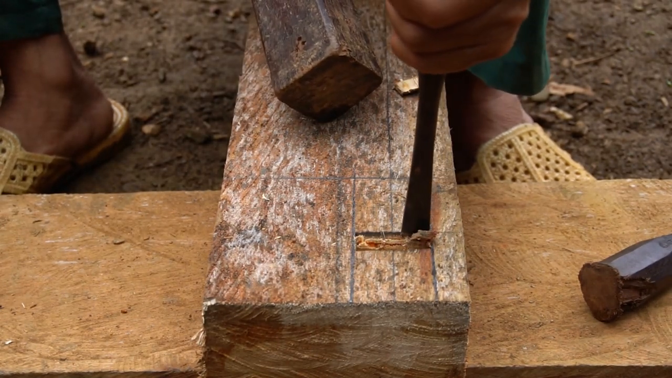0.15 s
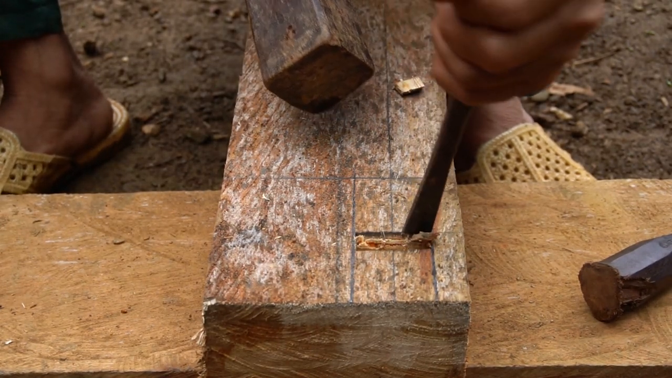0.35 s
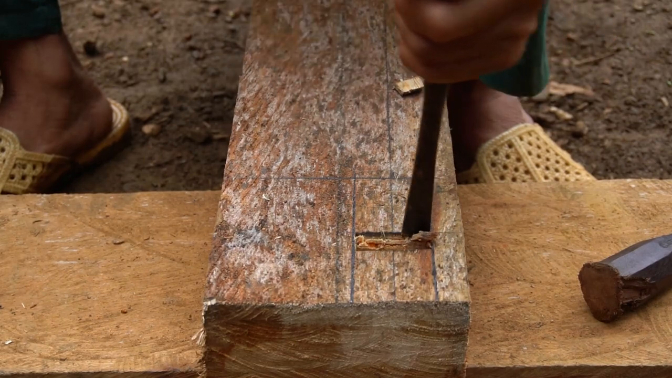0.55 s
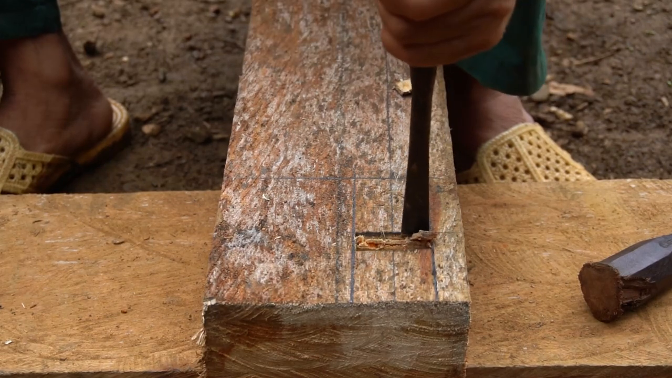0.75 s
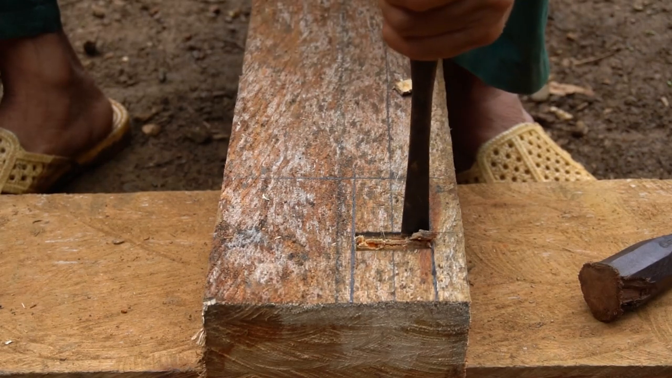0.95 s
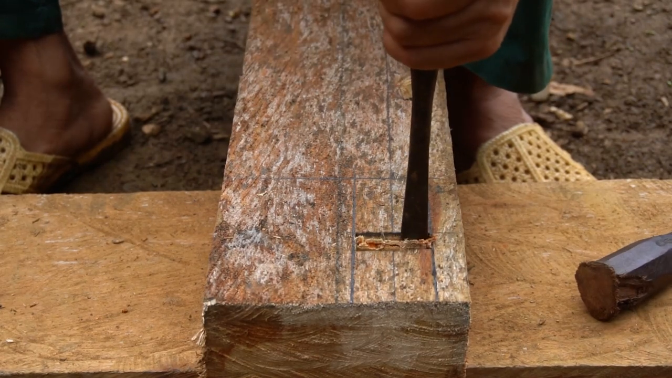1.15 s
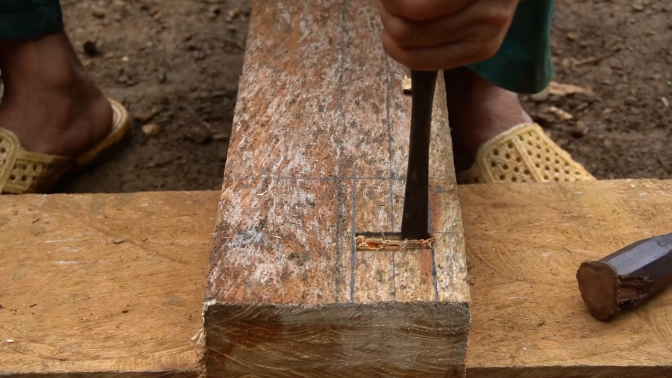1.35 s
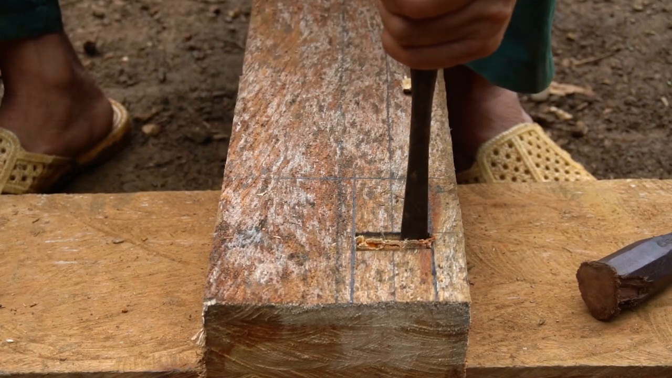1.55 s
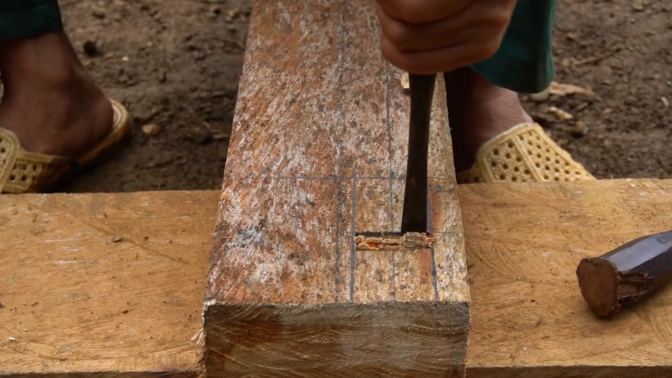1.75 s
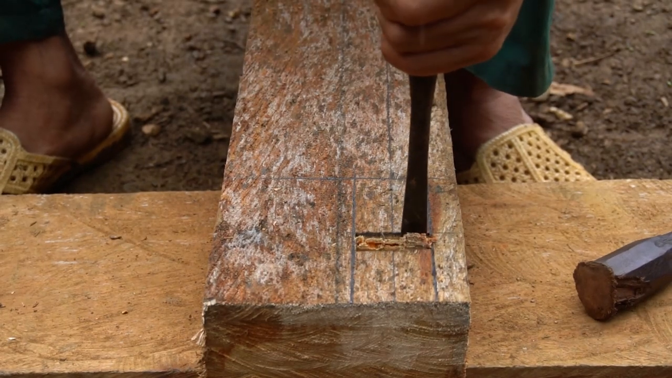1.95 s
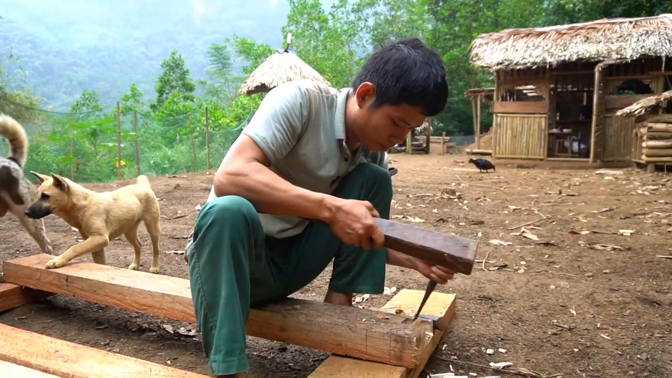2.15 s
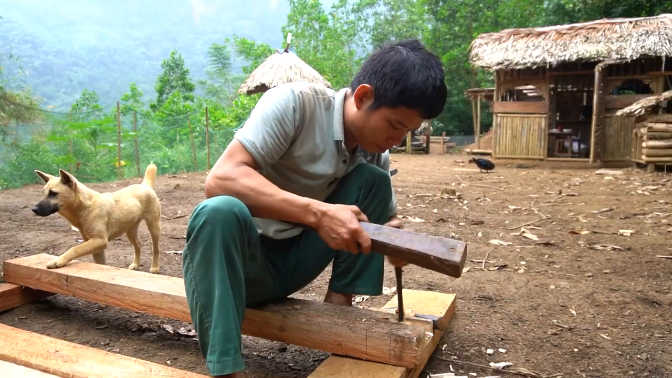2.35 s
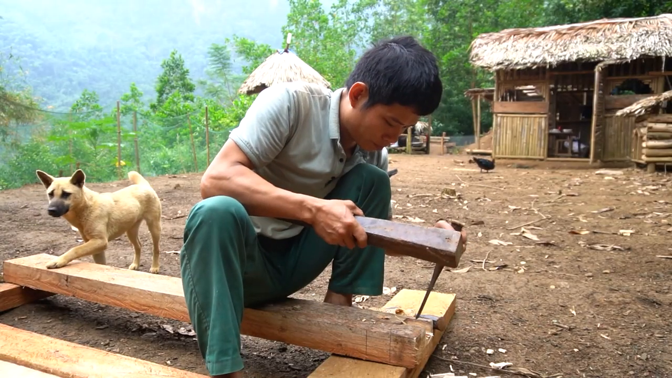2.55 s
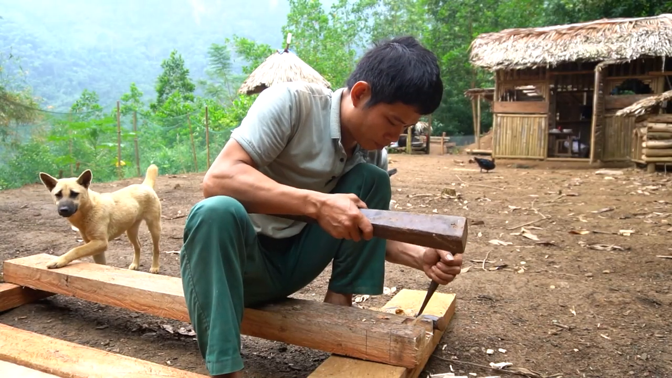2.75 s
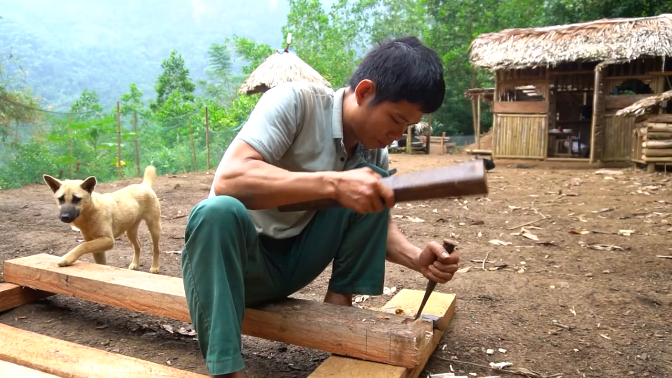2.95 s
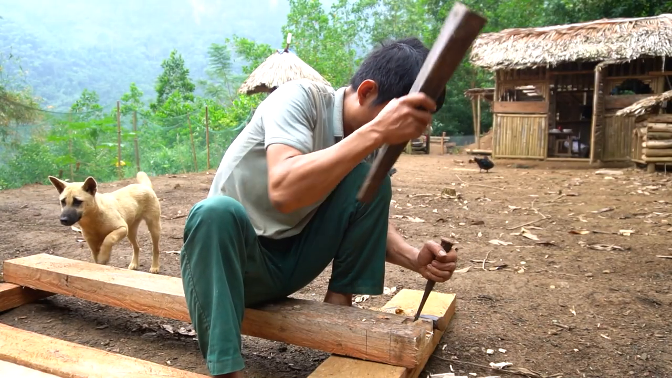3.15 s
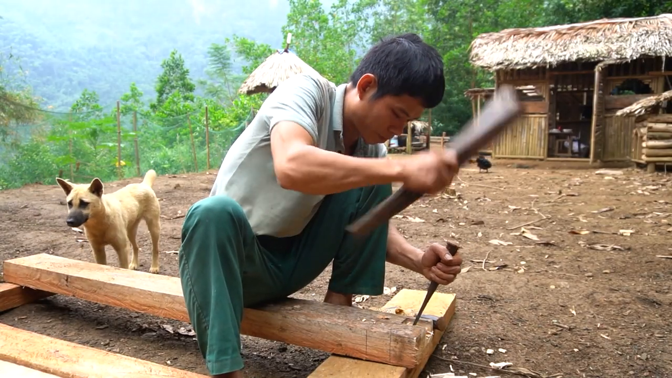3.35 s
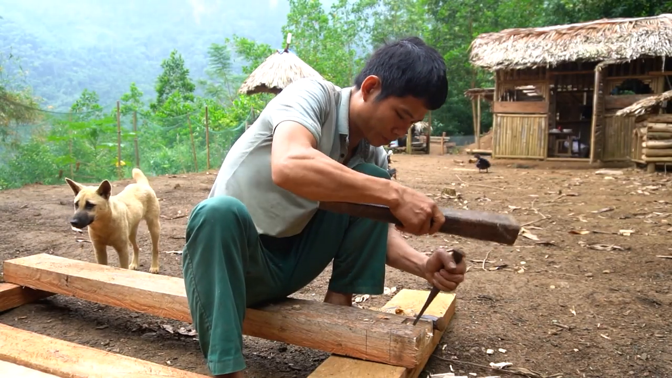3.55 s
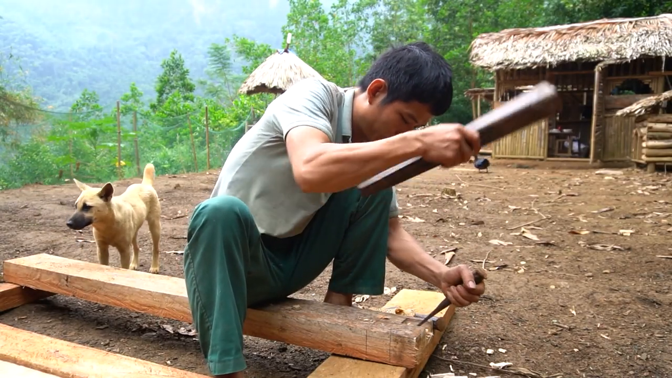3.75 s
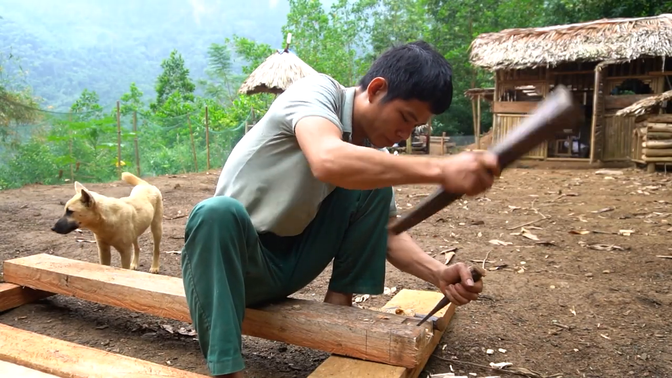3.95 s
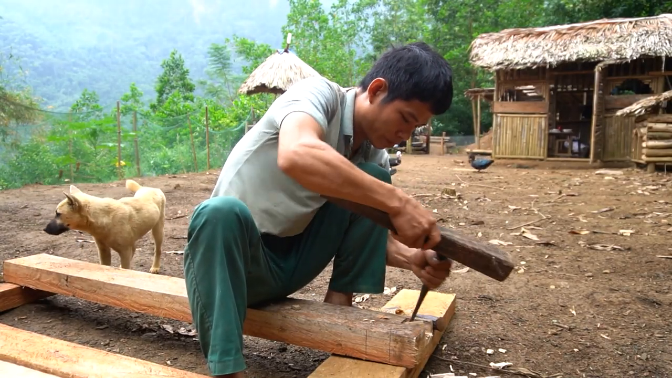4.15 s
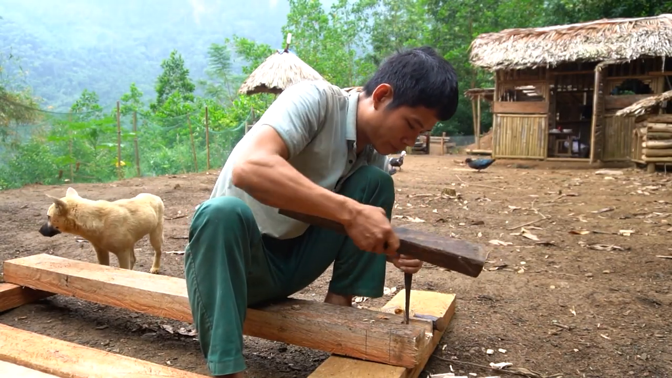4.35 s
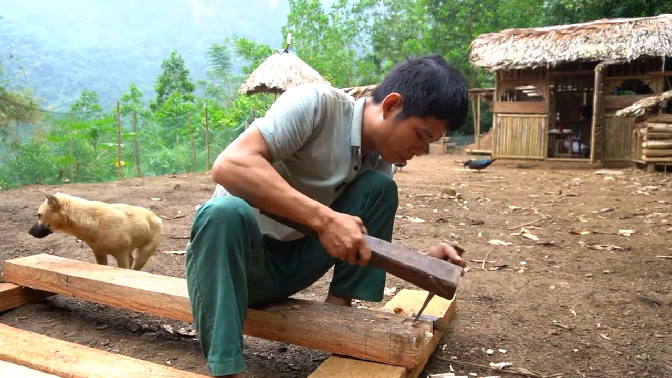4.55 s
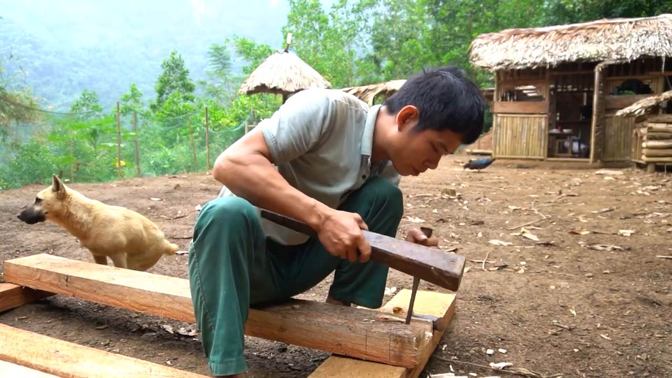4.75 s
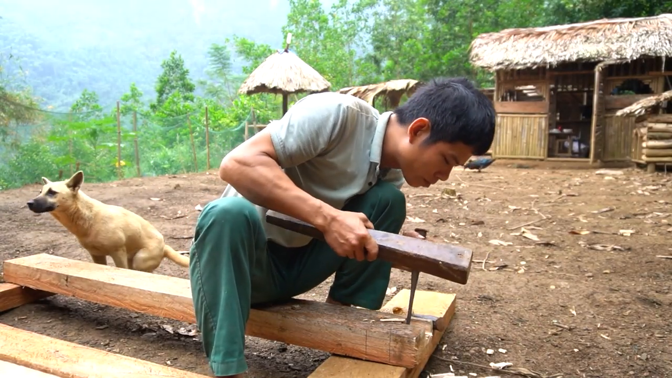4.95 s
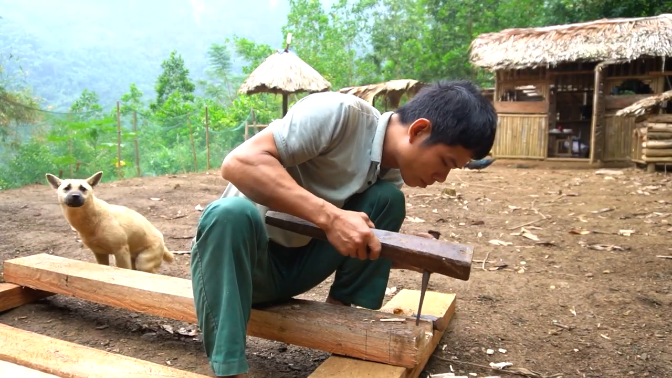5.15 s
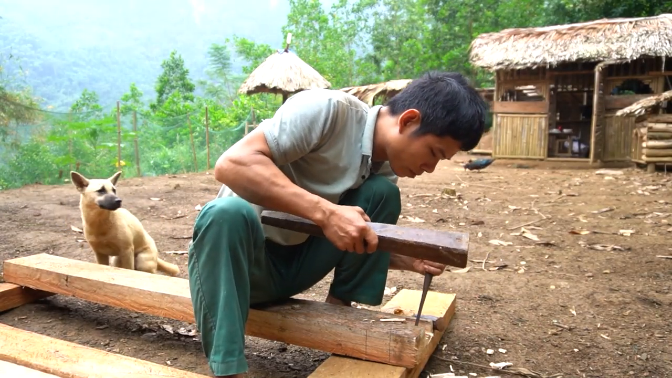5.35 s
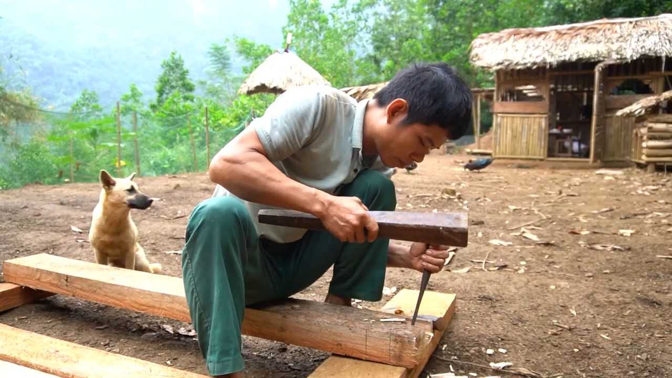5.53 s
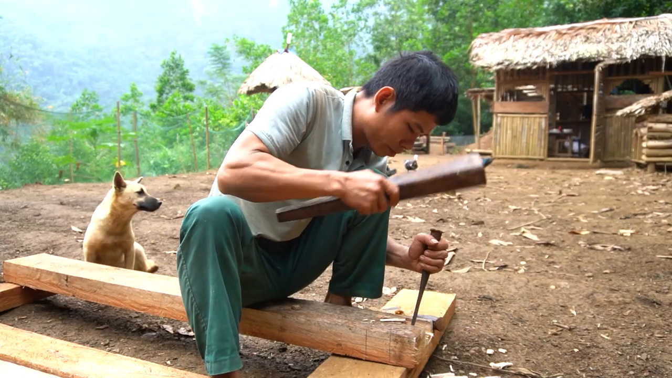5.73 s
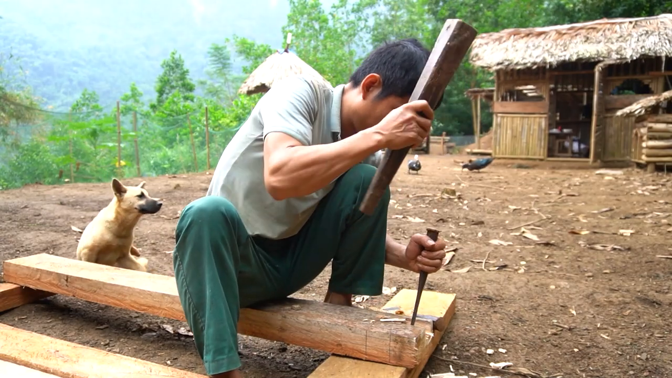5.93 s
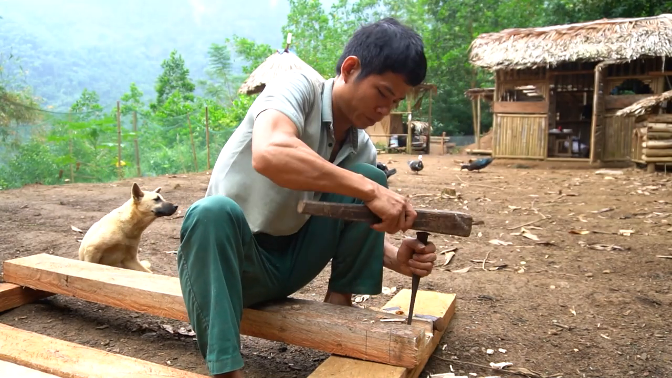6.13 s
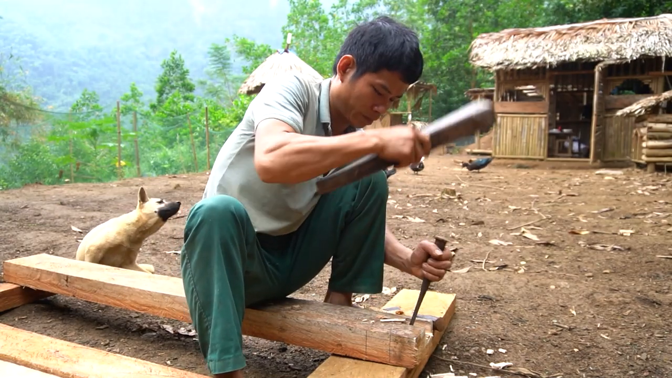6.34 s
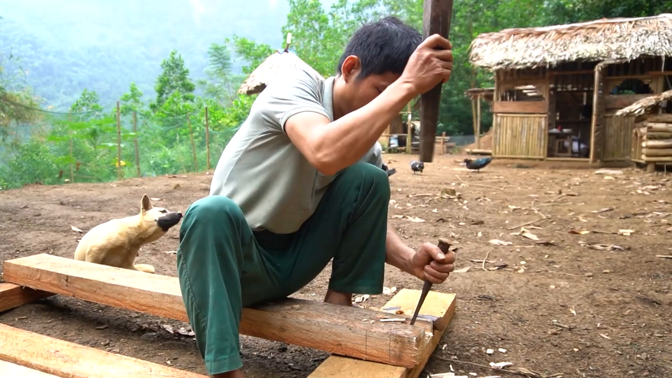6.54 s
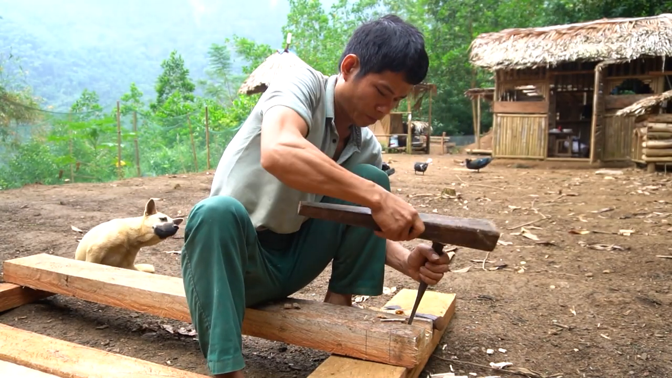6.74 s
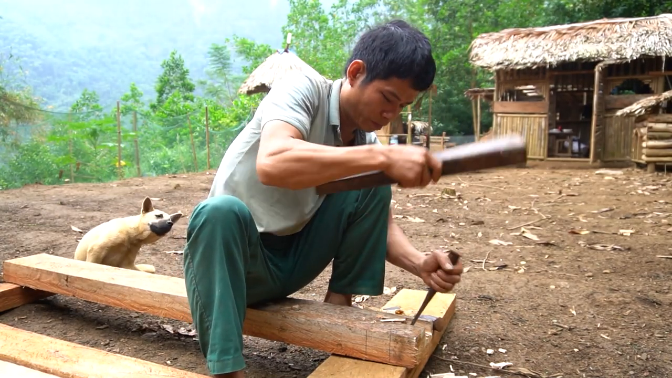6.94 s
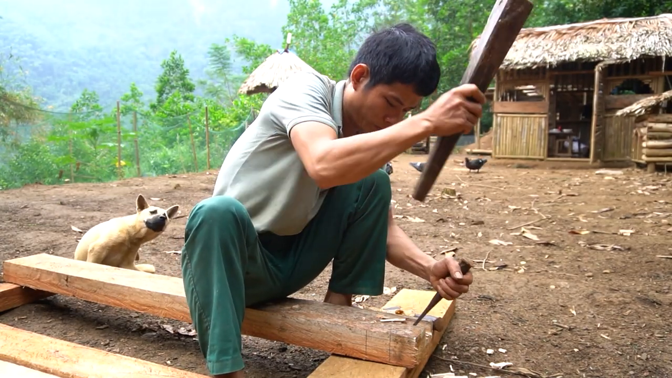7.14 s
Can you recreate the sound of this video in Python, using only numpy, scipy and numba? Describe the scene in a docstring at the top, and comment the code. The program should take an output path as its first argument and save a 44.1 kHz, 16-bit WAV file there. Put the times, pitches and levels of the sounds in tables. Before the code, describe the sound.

Three pairs of sharp mallet blows on a chisel in a wooden beam, with light taps between and distant cicadas.

```python
"""A farm yard, where a wooden mallet drives a chisel into a timber beam close to the microphone.
Each impact tears fibres, excites the damped modes of mallet and beam, and scatters back from huts
and trees; a limiter holds it down. Distant cicadas hiss, leaves rustle and wind stirs the bass.
A faint pair of tones opens the scene, small taps fall between the blows and a fowl calls once."""
import sys
import numpy as np
from scipy import signal
from scipy.fft import rfft, irfft, next_fast_len
from scipy.io import wavfile
from scipy.ndimage import uniform_filter1d
from numba import njit

SR = 44100
rng = np.random.default_rng(int(sys.argv[2]) if len(sys.argv) > 2 else 0)


def store_wav(level_fs):
    """Save 16-bit WAV to argv[1]."""
    pcm = np.round(np.clip(np.atleast_2d(level_fs), -1, 1) * 32767)
    wavfile.write(sys.argv[1], SR, pcm.T.astype(np.int16))


N = 321489

# Level of the cicada hiss as heard, dipping after blows as the recorder turns its gain down:
# (time [s], level [dB])
HEARD_HISS_LEVELS = [(0.0, -43.5), (1.05, -42.5), (1.25, -47), (1.75, -44), (1.95, -47.5), (3.4, -44.5),
                     (3.7, -47.5), (5.1, -45), (6.1, -46), (7.29, -48.5)]
# Noise spectra, each (frequency [Hz], relative spectral level [dB])
CICADA_SPECTRUM = [(2940, -27), (5000, -12), (5230, -12), (5610, 3.5), (5960, 9), (6240, 6), (6520, 2.5),
                   (6900, -61), (7030, -67), (7200, -77), (9360, -45), (15800, -120)]
RUSTLE_SPECTRUM = [(100, 1), (200, 1.5), (400, 2), (650, 3.5), (1000, -5.5), (1700, -3), (3000, -7),
                   (5000, -14), (8000, -19.5), (12000, -24), (16000, -27.5)]
CRACK_SPECTRUM = [(1500, -88), (2500, 6.5), (3500, -3.5), (4800, -12), (6000, -10), (9000, -16.5),
                  (13000, -30), (17000, -16)]
SPLINTER_SPECTRUM = [(800, -5), (1500, 3), (3500, 6), (5000, -1.5), (8000, -9), (12000, -13.5),
                     (17000, -23)]
WIND_SPECTRUM = [(15, -4), (30, 11), (60, 13), (110, 4.5), (150, 1.5), (300, -80)]
GRIT_SPECTRUM = [(1500, -7), (3500, -2.5), (9000, -8.5), (16000, -9)]
# Swells of wind: (peak time [s], level [dB], half-width [s])
WIND_GUSTS = [(2.68, -61, 0.1), (3.86, -52.5, 0.15), (4.754, -59, 0.035), (5.218, -56, 0.17),
              (5.797, -62, 0.082), (7.1, -44, 0.14)]
# A tool sliding on wood: (time [s], duration [s], level [dB])
TOOL_SCRAPES = [(0.209, 0.15, -55.5), (0.7, 0.073, -60), (2.326, 0.09, -52.5), (4.71, 0.048, -55)]
# Ticks of grit and leaves: (time [s], level [dB], left minus right [dB])
GRIT_TICKS = [(0.282, -38, 0.5), (0.383, -43, -7), (0.61, -38, -11), (0.7064, -34, -6), (0.752, -36.5, -4),
              (0.782, -37, -9), (4.279, -35, -1.0), (5.226, -39, -2)]
# Wind striking the microphone: (time [s], peak level [dB], frequency [Hz], time scale [s])
WIND_PUFFS = [(0.217, -42, 65.4, 0.043), (3.076, -40, 113, 0.015), (4.999, -43, 158, 0.015),
              (5.45, -42, 156, 0.019), (6.985, -27.5, 98, 0.026), (7.062, -36, 83, 0.028)]
# Chips, tool and hand on wood: (time [s], knock peak [dB], frequency [Hz], left minus right [dB],
# burst length [s], 60 dB decay [cycles], relative tick level [dB])
WOOD_TAPS = [(0.661, -40, 1830, -14, 0.033, 43, -27), (2.177, -34, 1032, -3, 0.0098, 18, 0.5),
             (2.337, -44, 1910, -8, 0.017, 5.6, -11), (2.389, -43.5, 4230, -6, 0.012, 14, -1.5),
             (2.799, -33.5, 3600, -6, 0.0069, 6.3, -5), (2.878, -33, 2800, -5, 0.067, 4.9, -19),
             (2.906, -29, 1130, -5, 0.077, 7.4, -45), (2.922, -42, 620, 0, 0.021, 19, -34),
             (2.942, -36.5, 1111, 4, 0.16, 2.3, -42), (3.241, -40, 702, -1, 0.022, 2.8, -38),
             (3.764, -34.5, 393, 2.5, 0.074, 7.2, -34), (4.685, -38, 353, 0, 0.054, 2.7, -33),
             (4.769, -42, 234, 1, 0.047, 4.4, -11), (4.989, -42.5, 590, 3, 0.023, 5, -17),
             (5.088, -40, 526, 3, 0.019, 22, -23), (5.154, -38.5, 2300, -2, 0.052, 66, -32),
             (5.18, -40, 410, 1, 0.02, 25, -21), (5.377, -37, 225, -2, 0.037, 3, -24),
             (5.419, -36, 2240, 6.5, 0.032, 3.6, -17), (5.922, -41, 1210, 7, 0.021, 4.6, -15),
             (6.076, -34.5, 683, 3, 0.1, 18, -34)]
# Reverberation of the yard: (band centre [Hz], level [dB], 60 dB decay [s])
ECHO_BANDS = [(257, -61, 0.082), (495, -29.5, 0.28), (1045, -31, 0.45), (1950, -30, 0.58),
              (3810, -31, 0.55), (8300, -36.5, 0.58), (14200, -42, 0.37)]
# Impacts: (time [s], strength re limiter threshold [dB], low mallet trim [dB], crack trim [dB],
# beam trim [dB], beam bass trim [dB], beam middle trim [dB], beam upper trim [dB], beam lag [s],
# chatter time scale [s], delay until the beam lands again [s], landing gain [dB])
IMPACTS = [(1.111, 6.5, -9, 4, 2, 2.5, 5.5, 0.5, 0.015, 0.021, 0.076, -4),
           (1.779, 4, -9.5, 3.5, 1.5, 1.5, 8.5, 6, 0.006, 0.037, 0.081, 1.5),
           (3.462, 8.5, -6.5, 0.5, -5, 1, 7.5, 4.5, 0.019, 0.018, 0.075, -1),
           (4.0856, 8, -4.5, -4, -9.5, 4, 9.5, 6, 0.019, 0.019, 0.063, -3),
           (6.143, 7, -8, 1, -1.5, -3, 9, -4, 0.0125, 0.018, 0.062, 0.5),
           (6.768, 9.5, -11, 0.5, -3, -6.5, 9, 1.5, 0.011, 0.029, 0.09, -1)]
# Normal modes, each (frequency [Hz], relative level [dB], 60 dB decay [s])
MALLET_MODES = [(1066, -12.5, 0.026), (1558, -1, 0.025), (1740, -4.5, 0.022), (2090, -4, 0.0059),
                (2736, 0.5, 0.013), (2873, -3.5, 0.012), (2988, -6, 0.013), (4030, -11, 0.015)]
BEAM_MODES = [(91.6, -18, 0.11), (154.3, -25, 0.071), (191.7, -12, 0.045), (258, -18.5, 0.08),
              (303, -9.5, 0.06), (368.4, -13.5, 0.19), (432.2, 3, 0.12), (507, -22, 0.12),
              (633, 1.5, 0.037), (709, -9, 0.088), (769, -2.5, 0.022), (861.5, -8.5, 0.065),
              (955, -2.5, 0.032), (1052, -13.5, 0.15), (1318, -3, 0.033), (1792, -8.5, 0.065)]
# Fundamental of the call: (time [s], frequency [Hz])
FOWL_CONTOUR = [(2.62, 520), (2.665, 578), (2.72, 585), (2.74, 567), (2.78, 577), (2.89, 585), (3.26, 586)]
# Harmonics of the call: (harmonic number [-], relative level [dB])
FOWL_HARMONICS = [(1, -9), (2, 4.5), (3, 1.5), (4, 3.5), (5, 2), (6, -6)]

THRESHOLD_DB = -6.5  # of the limiter
TIME = np.arange(N) / SR


def undb(db):
    """Amplitude ratio of a level in decibels."""
    return 10 ** (np.asarray(db) / 20)


def unit(x):
    """Normalisation to an rms of 1."""
    return x / np.sqrt(np.mean(x ** 2))


def curve(table):
    """Linear interpolation of (time [s], value) points at every sample."""
    return np.interp(TIME, *np.transpose(table))


def coloured(points, size):
    """Spectral shaping of white noise by (frequency [Hz], level [dB]) points."""
    hz, db = np.transpose(points)
    fast = next_fast_len(size)
    bins = np.maximum(np.fft.rfftfreq(fast, 1 / SR), 1)
    gain = undb(np.interp(np.log(bins), np.log(hz), db))
    return unit(irfft(rfft(rng.standard_normal(fast)) * gain, fast)[:size])


def wide(points, width, size):
    """Partly coherent stereo noise: a common part plus a part in antiphase."""
    mid, side = coloured(points, size), coloured(points, size)
    return (mid + width * side * np.array([[1], [-1]])) / np.sqrt(1 + width ** 2)


def walk(rate_hz):
    """Smoothed random fluctuation with an rms of 1."""
    hold = int(SR / rate_hz)
    steps = np.repeat(rng.standard_normal(N // hold + 1), hold)
    return unit(uniform_filter1d(uniform_filter1d(steps, hold), hold)[:N])


def ring(force, hz, t60):
    """Forced response of one damped mode."""
    pole = np.exp(2j * np.pi * hz / SR - np.log(1000) / (max(t60, .002) * SR))
    return signal.lfilter([1], [1, -pole], force).imag


def add(out, x, s, pan_db):
    """Superposition of a sound at time s, placed by a left-right level difference."""
    i = int(s * SR)
    x = x[..., :N - i]
    out[:, i:i + x.shape[-1]] += x * undb(np.array([[pan_db], [-pan_db]]) / 2)


def after_blows(peak_s):
    """Build-up and decay: an envelope that peaks peak_s after every impact."""
    ages = [(np.maximum(TIME - s, 0) / peak_s, db) for s, db, *_ in IMPACTS]
    return sum(undb(db) * age * np.exp(1 - age) for age, db in ages)


def cicadas():
    """Incoherent summation: many cicadas blur into one band of noise."""
    chorus = wide([(4300, -50)] + list(CICADA_SPECTRUM) + [(7800, -18.5)], 1, N)
    return chorus * undb(curve(HEARD_HISS_LEVELS) + walk(21) + 0.99 * walk(120))


def rustle():
    """Broadband noise of leaves and the far yard; scattering from trees swells it after each blow."""
    low = [(60, -39)] + [p for p in RUSTLE_SPECTRUM if p[0] < 1200] + [(1400, -37)]
    high = [(700, -27)] + [p for p in RUSTLE_SPECTRUM if p[0] > 900]
    noise = wide(low, 0.42, N) * undb(2 * walk(3.1) - 4.5)
    noise += wide(high, 0.65, N) * undb(walk(8.4) - 3)
    return noise * (undb(-50.5) + undb(-56) * after_blows(peak_s=0.052))


def wind_and_thud():
    """Low-frequency pressure fluctuation: wind on the microphone, and the ground's thud after a blow."""
    rumble = wide(WIND_SPECTRUM, 0.01, N) * undb(2 * walk(20))
    gusts = sum(undb(db) * np.exp(-((TIME - s) / width_s) ** 2) for s, db, width_s in WIND_GUSTS)
    breeze, thud = undb(-64.5), undb(-56.5) * after_blows(peak_s=0.044)
    return rumble * (breeze + gusts + thud)


def hum(lowest_hz=734, gap_hz=59.9, lowest_s=0.29, end_s=0.615):
    """Frequency modulation: two faint wavering tones sag, rise again and fade."""
    hz = lowest_hz + 670 * (np.minimum(TIME, end_s) - lowest_s) ** 2
    fade = np.clip((end_s - TIME) / 0.1, 0, 1) * np.clip(TIME / 0.066, 0, 1)
    tones = 0
    for pitch in (hz, hz + gap_hz):
        amplitude = undb(-57.5 + 1.9 * walk(16.4))
        tones += amplitude * np.sin(2 * np.pi * np.cumsum(pitch * (1 + 0.0047 * walk(36.4))) / SR)
    return fade * tones


def grit():
    """Brief contacts of grit and leaves tick; sliding friction of a tool gives grainy treble noise."""
    out, t = np.zeros((2, N)), np.arange(SR // 4) / SR
    for s, db, pan_db in GRIT_TICKS:
        add(out, undb(db) * coloured(GRIT_SPECTRUM, len(t)) * np.exp(-t / 0.00099), s, pan_db)
    for s, length_s, db in TOOL_SCRAPES:
        grain = undb(18 * uniform_filter1d(rng.standard_normal(len(t)), size=16))
        stroke = np.sin(np.pi * np.clip(t / length_s, 0, 1))
        add(out, undb(db) * coloured(GRIT_SPECTRUM, len(t)) * grain * stroke, s, pan_db=-2)
    return out


def puffs():
    """Pressure bursts of wind give narrow-band rumbles, in phase at both microphone ports."""
    out, t = np.zeros((2, N)), np.arange(SR // 2) / SR
    for s, db, hz, scale_s in WIND_PUFFS:
        pressure = rng.standard_normal(len(t)) * (t / scale_s) * np.exp(-(t / scale_s) ** 2)
        rumble = ring(pressure, hz, t60=0.17)
        add(out, undb(db) * rumble / np.abs(rumble).max(), s, pan_db=0)
    return out


def taps():
    """Resonance of wood: a rough contact drives two damped modes and is itself heard as a tick."""
    out, t = np.zeros((2, N)), np.arange(SR // 4) / SR
    for s, db, hz, pan_db, length_s, cycles, tick_db in WOOD_TAPS:
        force = rng.standard_normal(len(t)) * np.exp(-t / length_s * 2)
        knock = ring(force, hz, cycles / hz) + 0.14 * ring(force, 1.69 * hz, 1.8 * cycles / hz)
        add(out, undb(db) * (knock / np.abs(knock).max() + undb(tick_db) * force), s, pan_db)
    return out


def yard_echoes(near, rise_s=0.032):
    """Diffuse scattering: dense echoes build up, then die fastest in the bass and the top treble."""
    t, response = np.arange(SR) / SR, 0
    for hz, db, t60 in ECHO_BANDS:
        octave = [(hz / 2, -50), (hz / np.sqrt(2), 0), (hz * np.sqrt(2), 0), (hz * 2, -50)]
        band = wide(octave, 0.59 * min(hz / 2000, 1.5), SR)
        response += band * undb(db - 60 * t / t60) * np.sqrt(hz / SR)
    response *= 1 - np.exp(-(t / rise_s) ** 2)
    return signal.fftconvolve(near.mean(axis=0, keepdims=True), response, axes=1)[:, :N]


def crack(t, lag_s, chatter_s, width=0.43):
    """Fracture noise: fibres tear under the edge, and chips go on splitting while the beam shakes."""
    tear = undb(-8.5) * wide(CRACK_SPECTRUM, width, len(t)) * np.exp(-t / 0.0025)
    age = np.maximum(t - lag_s, 0) / (1.81 * chatter_s)
    return tear + undb(-41) * wide(SPLINTER_SPECTRUM, width, len(t)) * age * np.exp(1 - age)


def mallet_ring(force, low_db):
    """Modal superposition: the mallet's modes alternate in sign and detune slightly with each blow."""
    out = 0
    for k, (hz, db, t60) in enumerate(MALLET_MODES):
        gain = (-1) ** k * undb(db + (low_db if hz < 2000 else 0))
        out += gain * ring(force, hz * (1 + .006 * rng.standard_normal()), t60)
    return out


def beam_mode(t, contact, landing, hz, t60, lag_s, chatter_s):
    """Forced vibration: one mode answers the blow, the beam's chatter on its rest and its landing."""
    age = np.maximum(t - lag_s, 0) / (chatter_s * (1.6 if hz < 330 else 1))  # the bass rocks longer
    in_step = (0.3 if 400 < hz < 700 else 0.06) * np.cos(2 * np.pi * (hz * t + rng.random()))
    chatter = (rng.standard_normal(len(t)) + in_step) * np.sqrt(age) * np.exp(-age)
    shaken = ring(chatter, hz, t60)
    clean_blow_energy = np.sum(ring(contact, hz, t60) ** 2)
    shaken *= np.sqrt(clean_blow_energy / np.sum(shaken ** 2))
    return shaken + ring(0.19 * contact + (.6 if hz > 700 else .1) * landing, hz, t60)


def blows():
    """Impulse excitation: a short contact cracks the wood and rings mallet and beam; the beam rebounds."""
    strikes, beams, t = np.zeros((2, N)), np.zeros((2, N)), np.arange(SR // 2) / SR
    contact = np.exp(-t / .00003)
    contact /= contact.sum()
    for (s, db, low_db, crack_db, beam_db, bass_db, middle_db, upper_db,
         lag_s, chatter_s, landing_s, landing_db) in IMPACTS:
        strength = undb(db + THRESHOLD_DB)
        skid = rng.standard_normal(len(t)) * np.exp(-t / 0.004)
        landing = undb(landing_db) * np.roll(skid / np.linalg.norm(skid), int(landing_s * SR))
        add(strikes, strength * undb(crack_db) * crack(t, lag_s, chatter_s), s, pan_db=1)
        add(strikes, strength * mallet_ring(contact + undb(-18) * landing, low_db), s, pan_db=-5)
        for hz, mode_db, t60 in BEAM_MODES:
            mode = beam_mode(t, contact, landing, hz, t60, lag_s, chatter_s)
            trim_db = upper_db if hz > 700 else middle_db if hz > 500 else bass_db if hz < 330 else 0
            pan_db = (hz > 330) * (1 + 1.5 * rng.standard_normal())
            add(beams, strength * undb(mode_db + trim_db + beam_db - 12.5) * mode, s, pan_db)
    return strikes, beams


def fowl(start_s=2.615, closing_s=2.916, flutter_hz=17.5):
    """A harmonic series: one nasal call swells and flutters, then fades and dulls as the beak closes."""
    phase = 2 * np.pi * np.cumsum(curve(FOWL_CONTOUR) * (1 + 0.003 * walk(60))) / SR
    age, closed_s = np.clip(TIME - start_s, 0, 1), np.clip(TIME - closing_s, 0, 1)
    shut = np.minimum(closed_s / 0.02, 1)
    level_db = -54 + 18 * (age - closed_s) - 52 * closed_s - 6 * shut
    gate = np.clip(age / 0.014, 0, 1) * (closed_s < 1)
    flutter = 1 + 0.8 * np.cos(2 * np.pi * flutter_hz * (TIME - 2.768))
    loss_db = 1 + 1.2 * np.exp(-age / 0.041) + 3 * shut + 40 * closed_s  # per harmonic above the second
    voice = 0
    for k, db in FOWL_HARMONICS:
        amplitude = undb(db - loss_db * max(k - 2, 0) + 2 * walk(32))
        voice += amplitude * (flutter if k < 3 else 1) * np.sin(k * phase)
    return np.sqrt(2) * gate * undb(level_db) * voice * undb([[-1.2], [1.2]])


def scene():
    """Superposition of direct sound, its echoes and the background."""
    (strikes, beam), knocks, call = blows(), taps(), fowl()
    echoes = yard_echoes(strikes + undb(-7.5) * beam + undb(-6) * knocks + undb(-8) * call)
    direct = strikes + beam + knocks + call + grit() + puffs() + hum()
    return direct + echoes + cicadas() + rustle() + wind_and_thud()


@njit
def follow(level, attack, release):
    """Envelope detection with separate rates of rise and fall."""
    envelope, out = 0., np.empty(len(level))
    for i in range(len(level)):
        envelope += (level[i] - envelope) * (attack if level[i] > envelope else release)
        out[i] = envelope
    return out


def record(dry, low_hz=43, top_hz=16000, ratio=6.4, attack_s=0.00042, release_s=0.0035, ceiling=.7):
    """Band limiting and compression: a limiter ducks all under a blow; the first spike clips softly."""
    dry = signal.sosfilt(signal.butter(2, low_hz, "high", fs=SR, output="sos"), dry)
    # the two ports lie close together, so they receive the same bass
    side = signal.sosfilt(signal.butter(2, 250, "high", fs=SR, output="sos"), dry[0] - dry[1]) / 2
    dry = dry.mean(axis=0) + side * np.array([[1], [-1]])
    envelope = follow(np.abs(dry).max(axis=0), 1 / (attack_s * SR), 1 / (release_s * SR))
    gain = np.minimum(1, undb(THRESHOLD_DB) / (envelope + 1e-9)) ** (1 - 1 / ratio)
    held = ceiling * np.tanh(dry * gain / ceiling)
    return signal.sosfilt(signal.ellip(8, .2, 70, top_hz, fs=SR, output="sos"), held)


dry = scene()
out = record(dry)
store_wav(out)
```